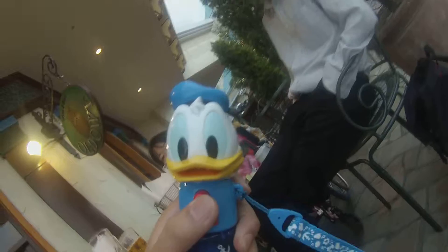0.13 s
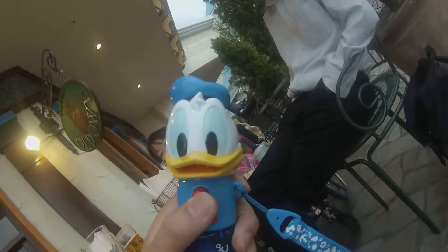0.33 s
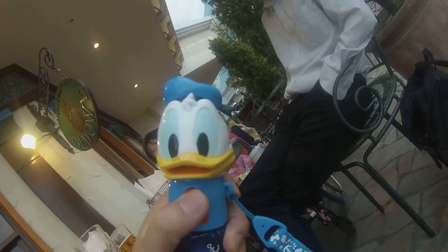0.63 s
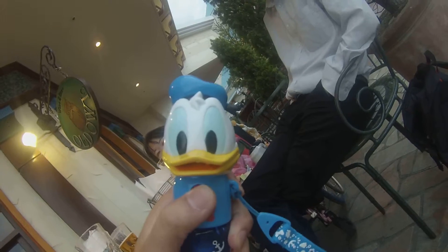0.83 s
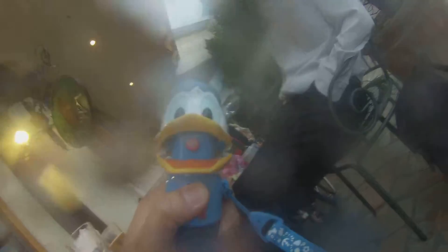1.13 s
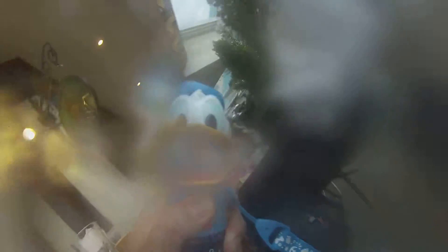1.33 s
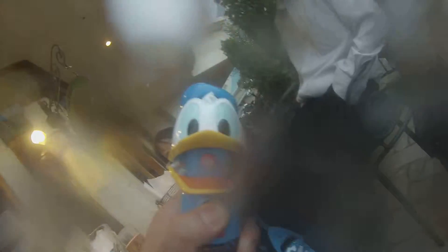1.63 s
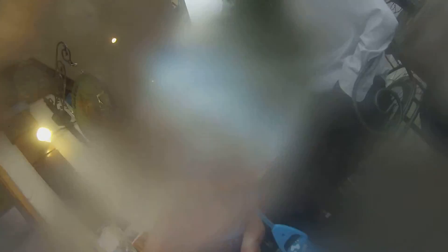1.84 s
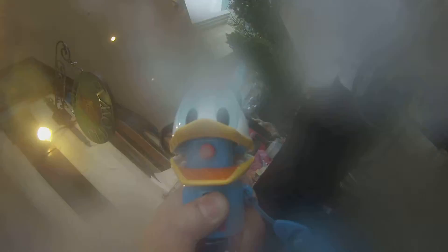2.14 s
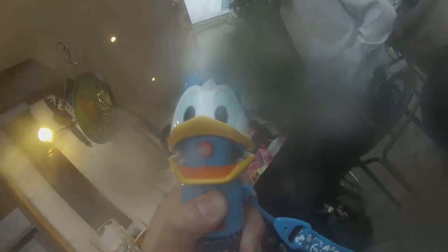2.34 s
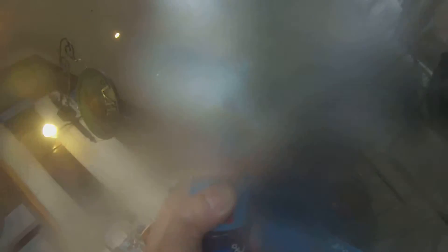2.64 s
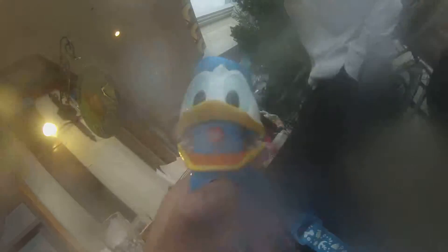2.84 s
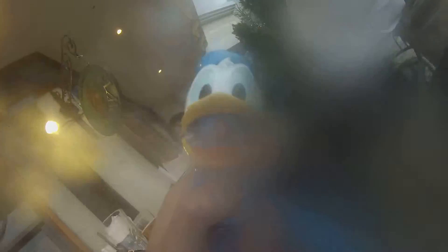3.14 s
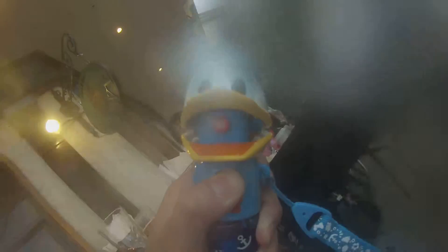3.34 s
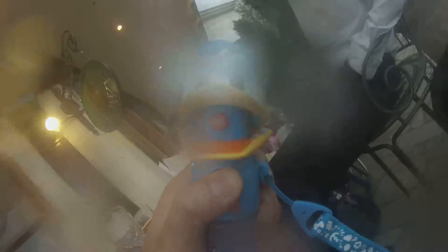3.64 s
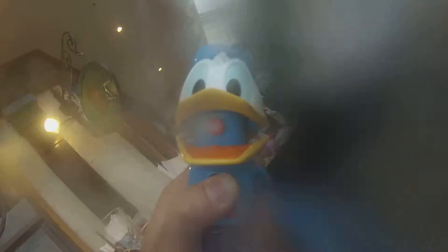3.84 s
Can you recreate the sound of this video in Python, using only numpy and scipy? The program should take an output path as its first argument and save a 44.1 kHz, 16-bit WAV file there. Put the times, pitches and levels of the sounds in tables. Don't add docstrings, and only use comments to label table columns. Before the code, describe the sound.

Water jet from a toy squirter drums on a camera case after hard button clicks and creaks

```python
import sys
import numpy as np
from scipy import signal
from scipy.fft import rfft, irfft, next_fast_len
from scipy.io import wavfile
from scipy.ndimage import uniform_filter1d

SR = 44100
rng = np.random.default_rng(int(sys.argv[2]) if len(sys.argv) > 2 else 0)


def to_linear_factor(level_db):
    exponent = np.asarray(level_db, float) / 20
    return 10 ** exponent


def output_pcm(signal):
    pcm = np.clip(np.atleast_2d(signal).T, -1, 1) * 32767
    wavfile.write(sys.argv[1], SR, np.round(pcm).astype(np.int16))


N = 176400

# [t/s, peak level/dB, chatter time/s, top f/Hz, cap ring level/dB, thud level/dB]
SNAPS = [
    (.1249, -5, .0004, 4200, -20, 5),
    (.1257, -8, .0007, 3800, -16, 2),
    (.1465, -30, .0015, 9000, -8, 0),
    (.1533, -2.5, .0005, 12000, -6, -8),
    (.16, -14, .0005, 9000, 5, 3),
    (.1611, -15, .0007, 4000, 6, 5),
    (.1652, -22, .0005, 10000, 0, -3),
    (1.0435, -39, .003, 6000, -5, -6),
]
# [f/Hz, width/Hz, level/dB]
SNAP_RING = [(2970, 440, -4.5), (3660, 460, -1.5), (4390, 510, 0.5), (7650, 1000, -6.5), (9600, 900, -7.5),
             (12600, 1400, -16)]
# [f/Hz, width/Hz, level/dB]
STEM_KNOCK = [(690, 370, 2), (1190, 300, -6.5)]
# [f/Hz, width/Hz, level/dB]
CAP_RING = [(1474, 220, 14), (1614, 61, -6)]
# [t/s, length/s, height from -1 to 1]
THUMB_PUSHES = [
    (0.098, 0.0021, -0.12),
    (0.1254, 0.0016, .12),
    (0.1292, 0.0069, 0.19),
    (0.133, 0.0047, -0.11),
    (.142, 0.01, -0.06),
    (0.1496, 0.0011, 0.28),
    (0.1525, 0.0019, 0.15),
    (0.156, 0.008, -0.16),
    (0.174, 0.017, 0.1),
    (0.197, 0.012, -0.093),
]
# [t/s, level/dB]
SCRAPE_LEVEL = [(.15, -80), (.163, -50), (.167, -35), (.174, -29.5), (.181, -32.5), (.188, -56),
                (.191, -78)]
# [f/Hz, width/Hz, level/dB]
SCRAPE_RING = [(1540, 200, 10), (3380, 340, 10), (4180, 290, -23.5), (6000, 400, -20), (7500, 1200, -9),
               (9400, 1300, -26.5), (12900, 2500, -28)]
# [t/s, level/dB]
RUB_LEVEL = [(.069, -40), (.09, -42.5), (.12, -39.5), (.145, -40), (.162, -36), (.181, -36), (.19, -54),
             (.215, -73), (.24, -76)]
# [f/Hz, level per Hz/dB]
RUB_COLOUR = [(200, -7), (500, -5.5), (1200, -5.5), (4200, -14), (5200, -23), (9000, -32.5), (15000, -34)]
# [f/Hz, width/Hz, level/dB]
RUB_RING = [(1540, 280, -12), (3350, 1600, -6), (8100, 1200, -6)]
# [t/s, level/dB]
GRIP_LEVEL = [(.21, -32), (.26, -42), (.6, -43), (1.04, -49), (1.09, -35.5), (1.2, -41.5), (1.25, -46),
              (1.32, -38.5), (1.4, -41.5), (1.95, -49.5), (2.05, -41.5), (2.36, -40.5), (2.43, -49),
              (2.49, -42), (2.56, -47), (3.68, -49), (3.74, -45), (3.8, -50.5), (4, -45)]
# [f/Hz, level per Hz/dB]
GRIP_COLOUR = [(6, -4), (12, -3.5), (35, -6.5), (65, -16), (110, -25), (200, -66)]
# [t/s, level/dB]
PALM_LEVEL = [(.5, -75), (.62, -61), (.82, -64), (.92, -76)]
# [t/s, level/dB]
AIR_LEVEL = [(.07, -65), (.45, -60), (.65, -56), (.84, -58), (.87, -56), (.92, -55), (.95, -56), (1.3, -73)]
# [f/Hz, level per Hz/dB]
AIR_COLOUR = [(45, -37), (80, -2), (130, 2), (220, -7.5), (340, -21), (1300, -18), (4000, -32),
              (12500, -44.5)]
# [f/Hz, width/Hz, level/dB]
AIR_BANDS = [(3450, 250, 8), (5500, 2500, -6)]
# [t/s, level/dB]
HISS_LEVEL = [(.2, -84), (.6, -75), (.84, -70), (.88, -63), (.92, -68), (1, -71)]
# [t/s, peak level/dB, crispness level/dB, push level/dB]
SLIPS = [(.207, -38, -17, -39), (0.22, -54, -18, -46), (0.232, -50, -15, -39), (0.253, -43, -16, -54),
         (.259, -46, -12, -40), (0.2816, -49, -19, -44), (0.285, -31.5, -11, -34), (0.307, -37, -9, -37),
         (.327, -52, -12, -42), (0.338, -55, -18, -40), (0.352, -31.5, -6.5, -59), (0.38, -44, -26, -50),
         (.400, -34, -5, -38), (0.452, -36, -4, -42), (.499, -34.5, -19, -51), (0.503, -38.5, 6, -45),
         (.513, -45, -15, -39), (0.548, -35, -5, -39), (.554, -42, -16, -59), (0.575, -42, -8, -40),
         (0.588, -51, -18, -41), (.624, -29, 0.5, -31.5), (0.656, -30.5, -4, -35), (0.693, -32.5, -4, -37),
         (0.726, -31, -3, -35), (.757, -34, -2.5, -40), (0.789, -35, -8, -38.5), (0.822, -36.5, -8, -45),
         (0.856, -39, -23, -48), (.892, -35.5, -31, -42)]
# [f/Hz, width/Hz, level/dB]
SLIP_RING = [(620, 600, 5), (1160, 400, 4.5), (2290, 380, 8.5), (2920, 460, -19), (4400, 590, -29),
             (6740, 1200, -28)]
# [t/s, level/dB, pressure from 0 to 1]
JET = [(1.068, -51, 0.4), (1.077, -47, 0.7), (1.08, -27, 0.57), (1.095, -30, 0.06), (1.13, -32.5, 0.66),
       (1.2, -29.5, 0.61), (1.32, -23.5, 0.75), (1.5, -22.5, 0.75), (1.68, -24.5, 0.6), (1.88, -26, 0.54),
       (2.0, -28.5, 0.43), (2.3, -30.5, 0.24), (2.7, -31, 0.16), (2.9, -29, 0.35), (3.2, -28, 0.27),
       (3.35, -30, 0.17), (3.6, -29.5, 0.1), (4, -32.5, 0.06)]
# [f/Hz, level per Hz/dB]
SOFT_COLOUR = [(88, -34), (150, -21.5), (664, -9.5), (1100, -2), (4500, -5), (6250, -12.5), (9020, -13),
               (13300, -19), (15200, -26)]
# [f/Hz, level per Hz/dB]
HARD_COLOUR = [(88, -52), (150, -21), (627, -25.5), (1230, -9.5), (2880, -5.5), (4590, 2.5), (5050, -4.5),
               (10700, -14.5), (15200, -25)]
# [f/Hz, width/Hz, level/dB]
SHELL_RING = [(1230, 80, -27), (1600, 50, -22), (3330, 780, -9), (4560, 186, -1), (5800, 390, -8),
              (8820, 1100, 2), (11400, 430, -6), (12970, 1450, 2.5), (15200, 410, -1)]
# [f/Hz, width/Hz, level/dB]
PRESSURE_RING = [(4720, 200, 0.5), (1550, 38, 2)]
# [f/Hz, width/Hz, level/dB]
RIM_RING = [(5560, 360, 8), (6500, 260, 5), (10800, 600, 5)]
# [t/s, level/dB]
RIM_LEVEL = [(1.07, -20), (1.3, -21), (1.55, -1), (1.8, 5.5), (2, 5.5), (2.2, 5), (2.5, 0), (4, -11)]
# [t/s, peak level/dB, pitch f/Hz]
SINGLE_DROPS = [(1.089, -11.0, 4520), (1.0965, -17.0, 3400), (1.317, -10.0, 4630), (1.405, -13.0, 4840),
                (1.4168, -10.0, 4480), (1.4911, -9.0, 4370), (1.4951, -10.0, 4540), (1.765, -10.0, 4330),
                (1.8771, -10.0, 4540), (1.9019, -11.0, 4370), (2.0197, -14.0, 4260), (2.266, -17.0, 4590),
                (2.3663, -17.0, 4370), (2.3982, -16.0, 4520), (2.458, -18.0, 5600), (2.4867, -16.0, 13070),
                (2.5032, -15.0, 12960), (2.8011, -17.0, 4460), (2.877, -16.0, 4500), (3.0364, -15.0, 4330),
                (3.1215, -16.0, 4350), (3.2133, -16.0, 4520), (3.4176, -15.0, 2820), (3.7488, -18.0, 3340),
                (3.9641, -19.0, 3320),
                (1.079, -22, 4440),
    (1.0885, -22, 8800),
    (1.117, -18, 8800),
    (2.4865, -22, 9500),
    (2.5032, -19, 8600),
    (2.5032, -21, 10800),
    (2.5245, -24, 13000),
]
# [from t/s, to t/s]
TOP_OPEN = [(0, .19), (.31, .385), (.56, .63), (.77, .815), (.835, 1.03), (1.04, 1.05), (1.068, 5)]


def evened(x):
    return x / np.sqrt(np.mean(x ** 2) + 1e-20)


def curve(rows, col):
    rows = np.array(rows)
    return np.interp(np.arange(N) / SR, rows[:, 0], rows[:, col])


def add(mix, s, sound):
    part = mix[round(s * SR):][:len(sound)]
    part += sound[:len(part)]


def colour(x, points):
    size = next_fast_len(len(x) + 4096)
    f, db = np.transpose(points)
    hz = np.fft.rfftfreq(size, 1 / SR)
    gain = to_linear_factor(np.interp(np.log(hz + 1), np.log(f + 1), db))
    return irfft(rfft(x, size) * gain, size)[:len(x)]


def filtered(x, order, hz, kind="low"):
    return signal.sosfilt(signal.butter(order, hz, kind, fs=SR, output="sos"), x)


def body(x, modes, shift=1):
    out = 0
    for hz, width, db in modes:
        ring = signal.iirpeak(min(hz * shift, SR / 2.2), hz / abs(width), SR)
        out = out + to_linear_factor(db) * signal.lfilter(*ring, x)
    return out


def wander(hz):
    slow = signal.butter(2, hz, fs=SR, output="sos")
    return evened(signal.sosfiltfilt(slow, rng.standard_normal(N)))


def burst(decay_s, noise, chatter):
    x = chatter * noise * np.exp(-np.arange(len(noise)) / SR / abs(decay_s))
    x[:2] = 1
    return x


def button():
    out = np.zeros(N)
    t = np.arange(N // 8) / SR
    noises = rng.standard_normal((len(SNAPS), 1500))
    for (s, db, chatter_s, top_hz, cap_db, thud_db), noise in zip(SNAPS, noises):
        tick = filtered(burst(chatter_s, noise, chatter=0.63), 2, top_hz)
        tick = filtered(tick, 6, 13300)
        snap = body(tick, SNAP_RING) + to_linear_factor(thud_db) * body(tick, STEM_KNOCK)
        cap = body(tick, CAP_RING)
        add(out, s, to_linear_factor(db) * (snap / abs(snap).max() + to_linear_factor(cap_db) * cap / abs(cap).max()))
    for s, length_s, height in THUMB_PUSHES:
        add(out, 0, height * np.exp(-(2 * (t - s) / length_s) ** 2 / 2))
    grains = rng.standard_normal(N) * to_linear_factor(2 * wander(300))
    scrape = evened(body(grains[::-1], SCRAPE_RING))
    rub = evened(colour(grains + body(grains, RUB_RING), RUB_COLOUR))
    return out + to_linear_factor(curve(SCRAPE_LEVEL, 1)) * scrape + to_linear_factor(curve(RUB_LEVEL, 1)) * rub


def grip():
    held = np.clip((np.arange(N) / SR - 0.2) / 0.069, .12, 1)
    drag = evened(filtered(rng.standard_normal(N), 2, [110, 300], "band"))
    level = held * to_linear_factor(curve(GRIP_LEVEL, 1) + 0.74 * wander(2.2))
    rumble = evened(colour(rng.standard_normal(N), GRIP_COLOUR))
    return to_linear_factor(curve(PALM_LEVEL, 1)) * drag + level * rumble


def air():
    rustles_per_s = 150
    rustle = to_linear_factor(1.7 * np.minimum(rng.exponential(1, N), 2)) * (rng.random(N) < rustles_per_s / SR)
    x = rng.standard_normal(N) + 2.2 * rustle
    wash = evened(colour(filtered(x + body(x, AIR_BANDS), 8, 12500), AIR_COLOUR))
    hiss = filtered(rng.standard_normal(N), 4, [2500, 14800], "band")
    hiss = colour(hiss, [(3000, 3), (15000, -12)])
    return to_linear_factor(curve(HISS_LEVEL, 1)) * hiss + to_linear_factor(curve(AIR_LEVEL, 1) + 3.6 * wander(16)) * wash


def creak():
    tick_s, tail_s, push_s = 0.0013, 0.0019, 0.0028
    tick_db, tail_db, dull_hz = -1.5, -10.5, 2480
    out = np.zeros(N)
    t = np.arange(1500) / SR
    noises = rng.standard_normal((len(SLIPS), 1500))
    for (s, db, crisp_db, push_db), noise in zip(SLIPS, noises):
        tail = to_linear_factor(tail_db) * noise[::-1] * np.exp(-t / tail_s)
        tick = burst(tick_s, noise, chatter=0.15) + tail
        x = filtered(body(tick, SLIP_RING, shift=1 + .07 * noise[-1]), 3, 7500)
        dull = filtered(x, 2, dull_hz)
        x = dull + to_linear_factor(crisp_db) * (x - dull)
        u = t / push_s
        push = np.minimum(u * 8, 1) * np.exp(-u * u)
        add(out, s, -to_linear_factor(db + tick_db) * x / abs(x).max() - to_linear_factor(push_db) * push)
    return out


def splat(x):
    spread_s = .0012
    hz = np.fft.rfftfreq(len(x), 1 / SR)
    delay = spread_s * (1 + np.sin(hz / 410) * np.cos(hz / 1130))
    return irfft(rfft(x) * np.exp(-2j * np.pi * np.cumsum(delay) * hz[1]), len(x))


def jet():
    start_s, drops_per_s, spread_db, mist = 1.0685, 5000, 2.5, 0.46
    size = to_linear_factor(spread_db * np.minimum(rng.exponential(1, N), 5)) * (rng.random(N) < drops_per_s / SR)
    hits = evened(splat(size * rng.choice([-1., 1.], N))) + mist * rng.standard_normal(N)
    hits *= to_linear_factor(1.11 * wander(210) + 0.09 * wander(38))
    drum = hits + body(hits, SHELL_RING)
    rim = to_linear_factor(curve(RIM_LEVEL, 1)) * body(hits, RIM_RING)
    hard = evened(colour(drum + body(hits, PRESSURE_RING) + rim, HARD_COLOUR))
    soft = evened(colour(drum, SOFT_COLOUR))
    p = np.clip(curve(JET, 2), 0, 1.3)
    blend = (p * hard + (1 - p) * soft) / np.sqrt(p ** 2 + (1 - p) ** 2 + 2.95 * p * (1 - p))
    out = to_linear_factor(curve(JET, 1)) * blend * (np.arange(N) > start_s * SR)
    t = np.arange(300) / SR
    for s, db, hz in SINGLE_DROPS:
        fade = np.minimum(t / 0.00011, 1) * np.exp(-t * hz / 2.6)
        add(out, s, to_linear_factor(db + 1) * fade * np.sin(2 * np.pi * hz * t))
    return out


def scene():
    return (button() + grip() + air() + creak() + jet())[None]


def low_pass(x):
    return signal.sosfilt(signal.butter(12, 15950, fs=SR, output="sos"), x)


def record(dry):
    start_s, edge_hz, ceiling = .0685, 15300, .97
    t = np.arange(N) / SR
    gate = np.clip((t - start_s) / 0.0011, 0, 1)
    shut = signal.sosfiltfilt(signal.butter(16, 12900, fs=SR, output="sos"), dry)
    is_open = 1. * sum((t > a) & (t < b) for a, b in TOP_OPEN)
    wide = uniform_filter1d(is_open, size=200)
    mix = np.clip((shut + wide * (dry - shut)) * gate, -ceiling, ceiling)
    top = signal.firwin(801, edge_hz, window=("kaiser", 3.5), fs=SR)
    mix = signal.oaconvolve(mix, top[None], "same")
    return low_pass(mix)


dry = scene()
out = record(dry)
output_pcm(out)
```